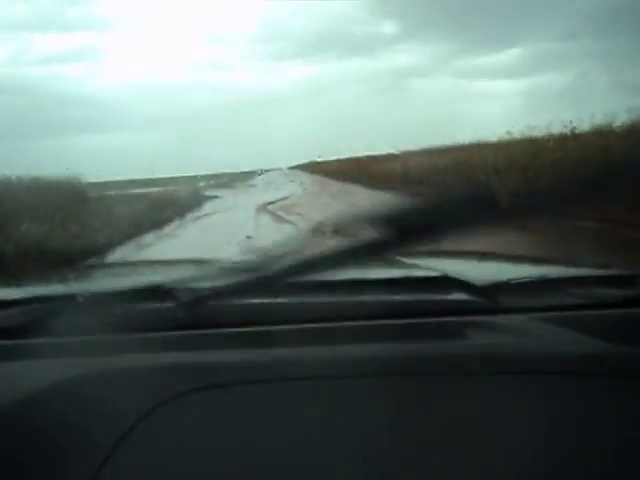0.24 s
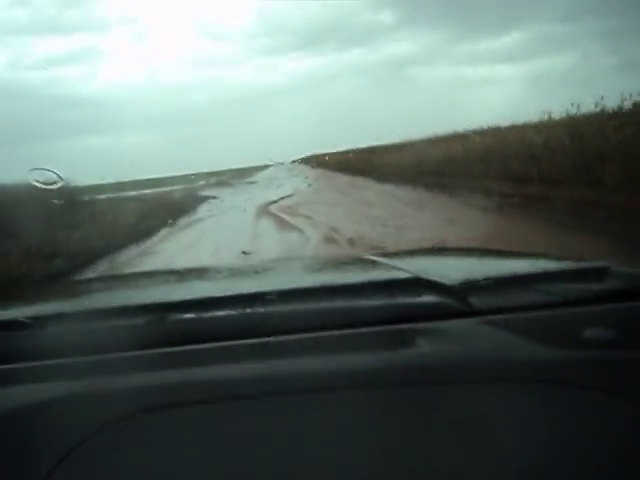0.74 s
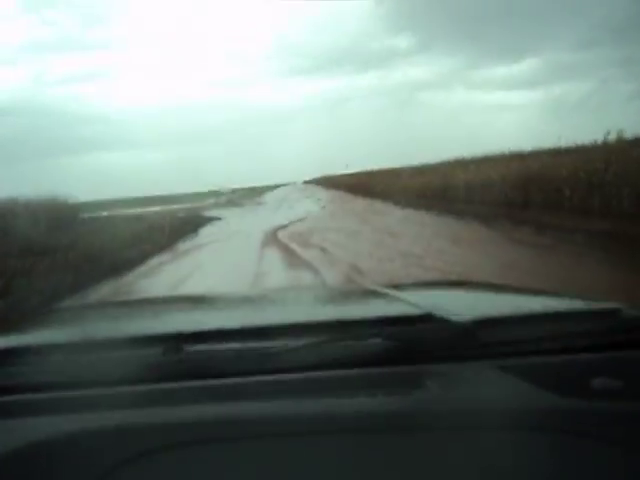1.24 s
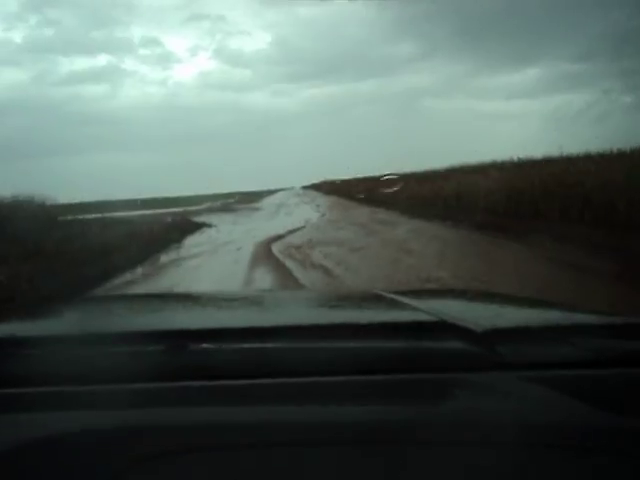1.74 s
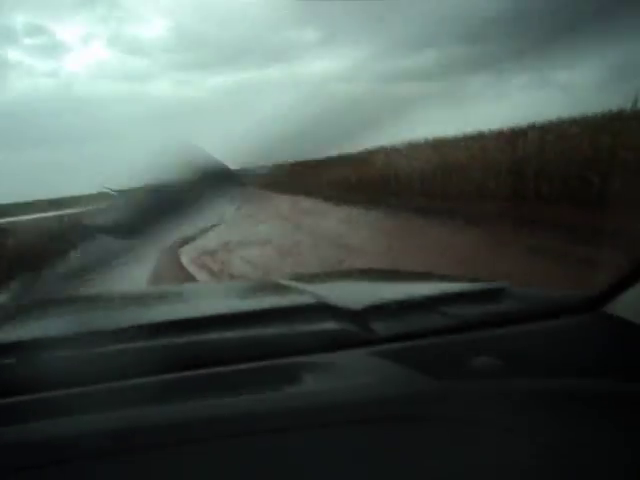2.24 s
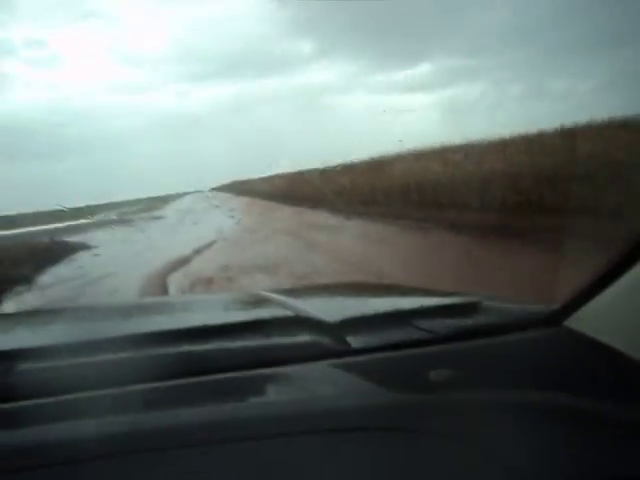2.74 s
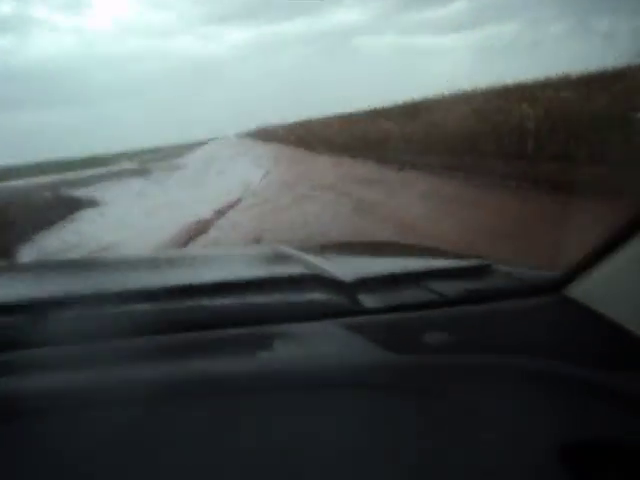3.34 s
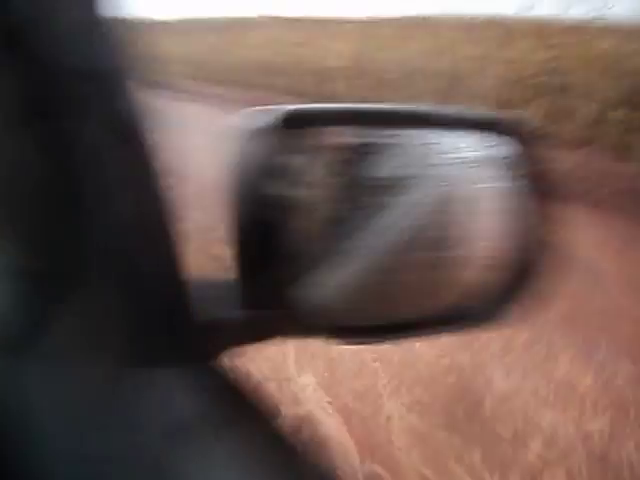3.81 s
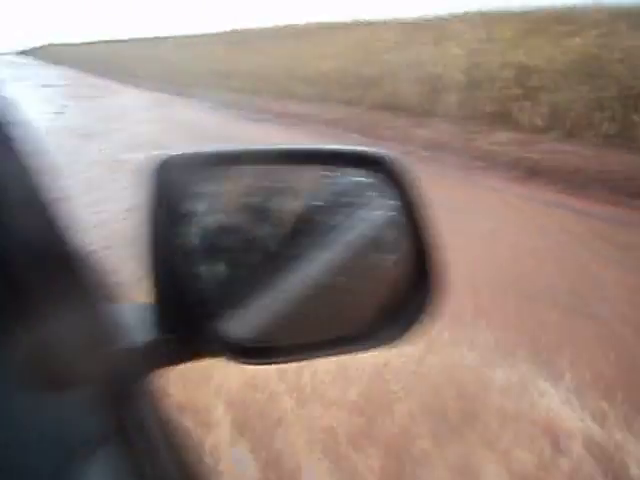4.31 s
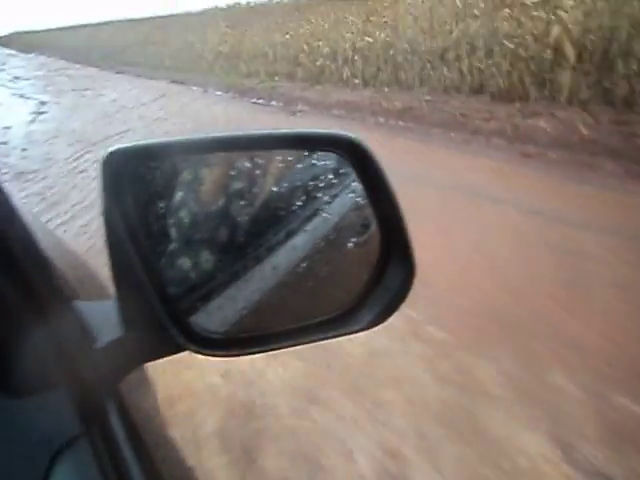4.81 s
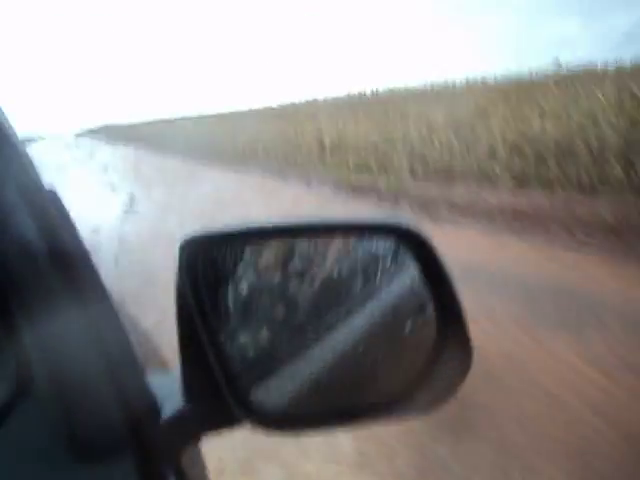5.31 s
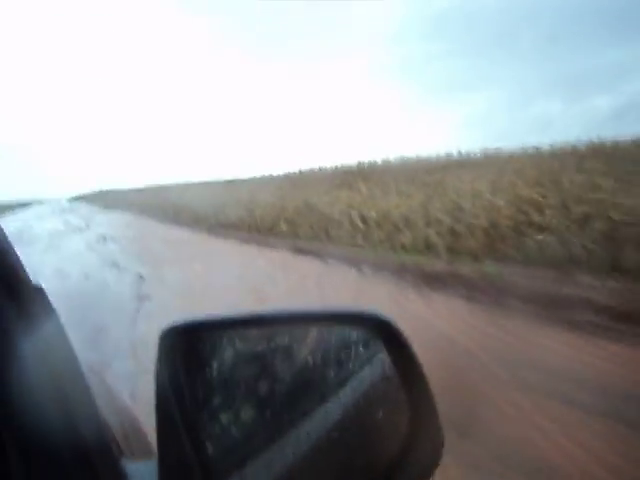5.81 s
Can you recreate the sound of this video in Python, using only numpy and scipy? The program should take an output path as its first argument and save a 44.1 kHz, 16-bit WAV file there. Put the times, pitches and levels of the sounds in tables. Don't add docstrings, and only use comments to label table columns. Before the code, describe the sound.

Inside a slow car on a flooded dirt road, engine drone and muffled water, thumping wipers, then hissing tyre spray and buffeting wind at an open window.

```python
import sys
import numpy as np
from scipy import signal
from scipy.io import wavfile
from scipy.ndimage import uniform_filter1d

SR = 44100
rng = np.random.default_rng(int(sys.argv[2]) if len(sys.argv) > 2 else 0)


def decibels_to_gain(level_db):
    exponent = np.asarray(level_db, float) / 20
    return 10 ** exponent


def unload_audio(sound):
    columns = np.transpose(np.atleast_2d(sound))
    steps = np.round(np.clip(columns, -1, 1) * 32767)
    wavfile.write(sys.argv[1], SR, steps.astype(np.int16))


N = 267244
T = np.arange(N) / SR

# time in seconds, share of sound coming straight through it [0-1].
WINDOW_SHARE = [(0, 0.14), (3.1, 0.14), (3.6, 0.58), (4.3, 0.88), (6.1, 1.01)]


def engine():
    # time in seconds, firing rate in Hz, firing tone level in dB.
    firing = [(0, 37.37, -38), (.8, 38.08, -30.5), (1.6, 37.15, -44), (2, 37.97, -32.5), (2.4, 39.3, -34.5),
              (3.68, 38.12, -34), (4, 38.26, -40), (5, 37.21, -32.5), (5.5, 38.38, -35.5),
              (6.06, 38.2, -30)]
    rate_hz = curve(firing, T) + 1.525 * drift(0.1208)
    turn = 2 * np.pi * np.cumsum(rate_hz) / SR
    tone = evened(np.sin(turn) + decibels_to_gain(-7.0) * np.sin(2 * turn + 1) + decibels_to_gain(-13.0) * np.sin(3 * turn))
    lumps = wash(22, 40, 0.92, 1.2, size=4096)
    drone_db, sway_db = -39.5, -1.5
    drone = (decibels_to_gain(drone_db) + decibels_to_gain(sway_db) * breeze()) * lumps
    return decibels_to_gain(curve(firing, T, column=2)) * tone + drone


def water():
    # time in seconds, splash level in dB.
    splash_level = [(0, -44), (.9, -42), (1.6, -43.5), (2.25, -40.5), (2.55, -42), (3.15, -40.5),
                    (3.4, -39.5), (3.6, -35.5), (3.75, -31.5), (4.05, -30.5), (4.3, -29), (4.65, -31.5),
                    (4.85, -31), (5.1, -31), (5.6, -32.5), (5.85, -31), (6.06, -34.5)]
    # time in seconds, boom
    # level in dB.
    boom_level = [(0, -35), (1.1, -37.5), (1.4, -34), (1.9, -32.5), (2.15, -36), (2.7, -35.5), (3.3, -32.5),
                  (3.68, -39), (3.8, -26), (4.07, -49.5), (6.06, -40)]
    boom = wash(57, 350, 1.5, 1.8, size=2048)
    roar = wash(350, 1500, 1.8, 1.4)
    roar = evened(roar + 0.26 * droplets(563, 1060, 320, 0.97, 23.0))
    fine_drops = dulled(droplets(1830, 4150, 1200, 3.5, 7.9))
    hiss = evened(wash(1235, 7800, 1.2, 1.34, size=512) + 0.31 * fine_drops)
    share = curve(WINDOW_SHARE, T)
    roar_db = 2.5 + share * (-2.5 - 2.5)
    hiss_db = -1.3 + share * (1.5 + 1.3)
    splash = decibels_to_gain(curve(splash_level, T)) * (decibels_to_gain(roar_db) * roar + decibels_to_gain(hiss_db) * hiss)
    rumble_db, spray_db = -2, -15
    body = (decibels_to_gain(curve(boom_level, T)) + decibels_to_gain(rumble_db) * breeze()) * boom
    return body + splash + decibels_to_gain(spray_db) * buffets() * roar


def wash(lo_hz, hi_hz, patchy_db, flicker_db, size=1024):
    # frequency in Hz, density in dB per Hz.
    behind_glass = [(12, -28), (20, -1.5), (81, -10), (159, -16.5), (188, -13), (268, -17), (317, -22.5),
                    (510, -20), (840, -17.5), (969, -26), (1450, -33), (2080, -25.5), (3680, -33),
                    (4890, -38), (5920, -60.5), (7700, -102), (13000, -120)]
    # frequency in Hz, density in dB per Hz.
    at_window = [(12, -39), (20, 10), (39, 10), (64, -13.5), (122, -14.5), (179, -10), (620, -13.5),
                 (969, -15), (1120, -14.5), (1800, -23), (2700, -27.5), (3350, -17), (3850, -17),
                 (5010, -30.5), (5920, -51.5), (7700, -89.5), (13000, -120)]
    frames, hz = 4 * N // size + 5, np.fft.rfftfreq(size, 1 / SR)
    real, imaginary, patches = rng.standard_normal((frames, len(hz), 3)).T
    patches = uniform_filter1d(patches, size // 80, axis=0)
    patches = evened(uniform_filter1d(patches, size=8, axis=1))
    flicker = evened(uniform_filter1d(rng.standard_normal(frames), size=3))
    share = np.clip(curve(WINDOW_SHARE, np.arange(frames) * size / 4 / SR), 0, 1)
    inside, outside = (np.interp(np.log(hz + 1), np.log(f), db)
                       for f, db in (np.transpose(behind_glass), np.transpose(at_window)))
    band = 1 / np.sqrt((1 + (lo_hz / (hz + 1)) ** 8) * (1 + (hz / hi_hz) ** 8))
    colour = decibels_to_gain(np.outer(inside, 1 - share) + np.outer(outside, share)) * band[:, None]
    colour = colour / np.linalg.norm(colour, axis=0)
    z = (real + 1j * imaginary) * colour * decibels_to_gain(patchy_db * patches + flicker_db * flicker)
    return evened(signal.istft(z, nperseg=size, noverlap=3 * size // 4)[1][:N])


def droplets(lo_hz, hi_hz, per_s, spread_db, cycles):
    size = decibels_to_gain(spread_db * np.minimum(rng.exponential(1, N), 5))
    size = size * (rng.random(N) < per_s / SR)
    kind = rng.integers(0, 16, N)
    out = np.zeros(N)
    for k, hz in enumerate(np.geomspace(lo_hz, hi_hz, num=16)):
        drop = ring(hz, 0, cycles / hz, rise=1 / hz)[:2000]
        out += signal.oaconvolve(size * (kind == k), drop)[:N]
    return evened(out)


def wipers():
    # frequency in Hz, level in dB, t60 in seconds.
    modes = [(80, -27, 0.36), (123.6, -1.5, 0.061), (163, 4, 0.048), (208, -3.5, 0.064),
             (263.2, -4.5, 0.07), (371.6, -0.5, 0.061), (467, -5, 0.051), (524, -20, 0.21),
             (660, -0.5, 0.049), (797, -10, 0.065), (1130, -8.5, 0.024)]
    # time in seconds, strength in dB, extra depth in dB, slip rate in Hz.
    sweeps = [
        (.165, 0.5, -4.5, 213),
        (1.344, -0.5, 2, 212.7),
        (2.526, -0.1, -0.5, 211.5),
    ]
    # seconds after the turn, peak in dB, bright tick in dB, deep ring in dB
    # and in Hz.
    turn_knocks = [
        (0, -13.5, -25, -11.5, 118),
        (.0115, -13.5, -25.5, -25, 143),
        (.065, -22, -45, -23.5, 125),
        (.075, -14, -30, -19, 132.4),
    ]
    # seconds after the turn, force in dB.
    chatter = [(-.012, -21.5), (.012, -19), (.045, -18.5), (.08, -16.5), (.11, -23.5), (.175, -26.5),
               (.24, -38.5)]
    # seconds after the turn, level in dB.
    judder = [(.098, -18), (.14, -29.5), (.19, -29), (.23, -39.5)]
    # time in seconds, peak in dB, bright tick in dB, deep ring in dB
    # and in Hz.
    bumps = [(.69, -22, -32, -27, 163), (1.212, -40, -47, -24.5, 80), (1.508, -29, -44.5, -26.5, 216),
             (1.877, -18.5, -43, -11, 80), (2.968, -41, -54, -19.5, 219), (3.048, -18.5, -33, -19, 80),
             (3.775, -14, -41, -36, 163), (4.109, -42, -12, -41, 200)]
    out, force = np.zeros(N), np.zeros(N)
    cowl = sum(ring(*mode, rise=0.0023) for mode in modes)
    cowl = cowl * np.exp(-np.arange(len(cowl)) / SR / 0.15)
    slips = rng.uniform(-1.23, 1, N) * (rng.random(N) < 520 / SR)
    rattle = evened(signal.oaconvolve(slips, cowl)[:N])

    knocks = list(bumps)
    for s, strength_db, depth_db, slip_hz in sweeps:
        for lag, peak_db, tick_db, deep_db, deep_hz in turn_knocks:
            knocks.append((s + lag, peak_db + strength_db, tick_db + strength_db,
                           deep_db + strength_db + depth_db, deep_hz))
        t = np.arange(chatter[0][0], chatter[-1][0], 1 / SR)
        push = decibels_to_gain(curve(chatter, t) + strength_db - 4.5)
        add(force, s + t[0], push * signal.windows.tukey(len(t), .1))
        t = np.arange(judder[0][0], judder[-1][0], 1 / SR)
        wobble = 0.00075 * np.sin(2 * np.pi * (9.47 * t + rng.random()))
        turn = 2 * np.pi * slip_hz * (t + wobble)
        stack = np.sin(turn) + decibels_to_gain(-9.) * np.sin(2 * turn) + decibels_to_gain(-11.5) * np.sin(3 * turn)
        rub = 0.95 * decibels_to_gain(curve(judder, t) + strength_db) * stack
        add(out, s + t[0], rub * signal.windows.tukey(len(t), .3))

    tick = ring(1430, 0, 0.016) + ring(2100, -1.5, 0.017) + ring(2870, -0.32, 0.016) + ring(3700, -3.0, 0.011)
    tick = dulled(tick)
    for s, db, tick_db, deep_db, deep_hz in knocks:
        shades_db = 3 * rng.standard_normal(len(modes))
        thud = sum(ring(hz, d + shade, 0.42 * t60, rise=0.003)
                   for (hz, d, t60), shade in zip(modes, shades_db))
        thud = decibels_to_gain(db) * thud / abs(thud).max()
        deep = ring(deep_hz, deep_db, 0.2, rise=0.013)
        add(out, s, thud + deep + decibels_to_gain(tick_db - 3.5) * tick)

    panels = signal.butter(2, [130, 380], "band", fs=SR, output="sos")
    dull = evened(signal.sosfilt(panels, rattle))
    sharp = np.clip(force / decibels_to_gain(-23.5), 0, 1)
    return out + force * (sharp * rattle + (1 - sharp) * dull)


def taps():
    # time in seconds, final pitch in Hz, peak in dB, swell in seconds, pitch excess at the start as a
    hits = [(1.178, 800, -33, .004, 0), (1.2095, 760, -28.5, .003, .1), (1.69, 3400, -27, .0005, .5),
            (1.7241, 2900, -24, .0003, .3), (1.72435, 1000, -11.5, .0007, .5),
            (1.7905, 3300, -29, .0005, .2), (3.1683, 950, -10, .0005, .3), (3.16835, 2750, -7.5, .0003, .5),
            (3.1684, 600, -18, .003, 0), (3.1703, 1030, -18.5, .0025, 0), (3.3912, 1400, -10, .0005, .15),
            (3.3914, 3300, -24, .0005, 0), (3.402, 6100, -39, .002, 0), (3.69405, 950, -2, .0008, 3.1),
            (3.6944, 3000, -8.5, .0005, 0), (3.69425, 4950, -6,  .0004, 0), (4.508, 5000, -31, .0005, .1)]
    settle_s, after_db, after_cycles = .0006, -8, 20
    out, t = np.zeros(N), np.arange(SR // 20) / SR
    for s, hz, db, swell, excess in hits:
        turns = hz * (t + excess * settle_s * (1 - np.exp(-t / settle_s)))
        blow = (t / swell * np.exp(1 - t / swell)) ** 2
        after = decibels_to_gain(after_db - 60 * t * hz / after_cycles) * (1 - np.exp(-t / swell))
        add(out, s, decibels_to_gain(db) * (blow + after) * np.sin(2 * np.pi * turns))
    return dulled(dulled(out))


def wind():
    eddies = signal.lfilter([1], [1, -np.exp(-2 * np.pi * 120 / SR)], rng.standard_normal(N))
    eddies = signal.sosfilt(signal.butter(2, [25, 1100], "band", fs=SR, output="sos"), eddies)
    lump_db = -1
    return buffets() * evened(eddies * decibels_to_gain(lump_db * drift(.012)))


def buffets():
    # time in seconds, peak in dB, length in seconds.
    gusts = [(4.111, -22.5, 0.044), (4.218, -25, 0.086), (4.406, -21.5, 0.033), (4.529, -21.5, 0.1),
             (4.775, -19, 0.036), (4.815, -18, 0.035), (4.885, -20.5, 0.052), (4.938, -19.5, 0.045),
             (5.031, -17, 0.039), (5.037, -24.5, 0.056), (5.12, -31, 0.05), (5.352, -27, 0.11),
             (5.48, -24, 0.073), (5.58, -25.5, 0.038), (5.697, -22.5, 0.027), (5.783, -47.5, 0.12),
             (5.867, -20, 0.044), (5.938, -22, 0.056), (6.003, -16, 0.03), (6.052, -8, 0.04)]
    push = np.zeros(N)
    for s, db, length in gusts:
        u = 4 * np.arange(SR // 3) / SR / max(length, .01)
        add(push, s, decibels_to_gain(db - 5) * u * np.exp(1 - u))
    return push


def breeze():
    size = int(0.69 * SR)
    return uniform_filter1d(uniform_filter1d(buffets(), size), size)


def dulled(x):
    return signal.sosfilt(signal.butter(4, 5200, fs=SR, output="sos"), x)


def ring(hz, db, t60, rise=.00015):
    t = np.arange(SR // 4) / SR
    return decibels_to_gain(db - 60 * t / t60) * np.sin(2 * np.pi * hz * t) * (1 - np.exp(-t / rise))


def drift(seconds):
    size = int(seconds * SR)
    return evened(uniform_filter1d(uniform_filter1d(rng.standard_normal(N), size), size))


def evened(x):
    return x / np.sqrt(np.mean(x ** 2) + 1e-20)


def curve(rows, t, column=1):
    rows = np.asarray(rows)
    return np.interp(t, rows[:, 0], rows[:, column])


def add(mix, s, sound):
    part = mix[round(s * SR):][:len(sound)]
    part += sound[:len(part)]


def scene():
    return (engine() + water() + wipers() + taps() + wind())[None]


def top_cut(x):
    return signal.sosfilt(signal.butter(12, 16500, fs=SR, output="sos"), x)


def record(dry):
    # time in seconds, depth in dB.
    ducks = [
        (0.25, 1.5),
        (1.43, 2),
        (2.609, 2.5),
        (3.1734, 6.5),
        (3.6953, 17.5),
    ]
    attack_s, recovery_db_per_s = 0.00033, 16.96
    duck_db = np.zeros(N)
    for s, db in ducks:
        step = np.clip((T - s) / attack_s, 0, 1) * np.maximum(db - recovery_db_per_s * (T - s), 0)
        duck_db = np.maximum(duck_db, step)
    edge = signal.firwin(401, 6150, window=("kaiser", 9), fs=SR)
    ducked = np.clip(dry * decibels_to_gain(-duck_db), -.7, .7)
    narrow = signal.oaconvolve(ducked, edge[None], "same")
    return top_cut(np.clip(narrow, -.74, .74))


dry = scene()
out = record(dry)
unload_audio(out)
```